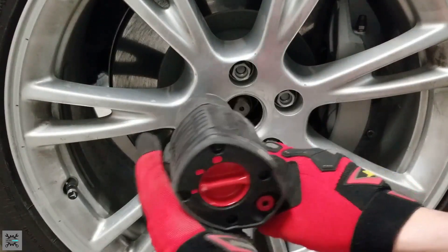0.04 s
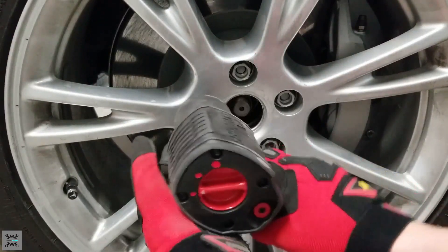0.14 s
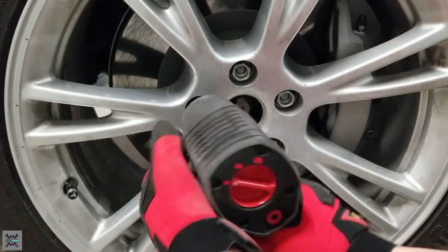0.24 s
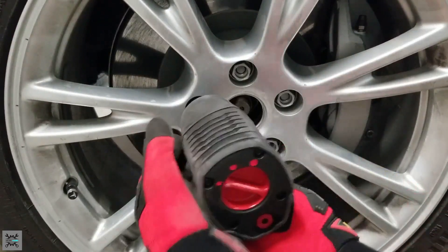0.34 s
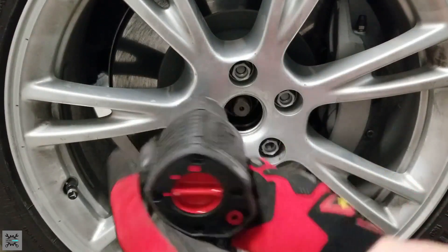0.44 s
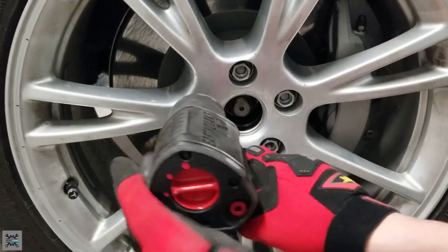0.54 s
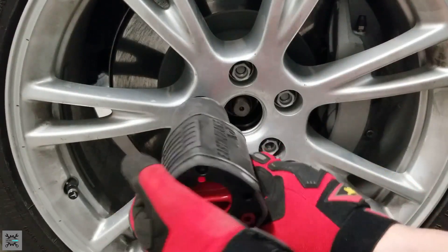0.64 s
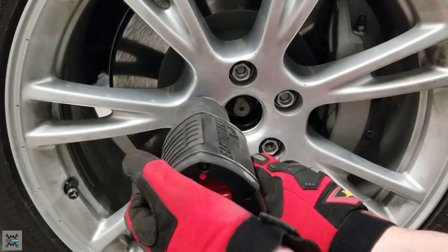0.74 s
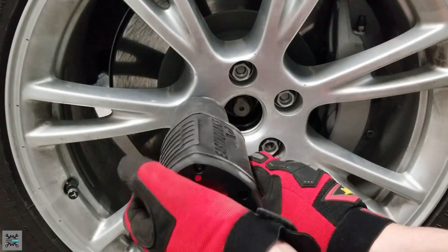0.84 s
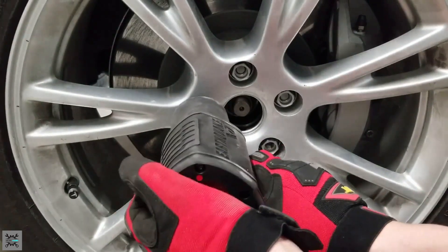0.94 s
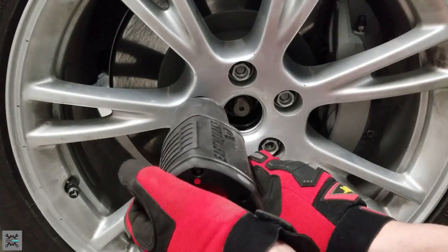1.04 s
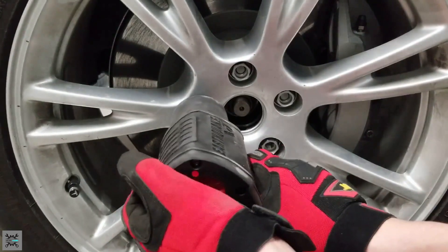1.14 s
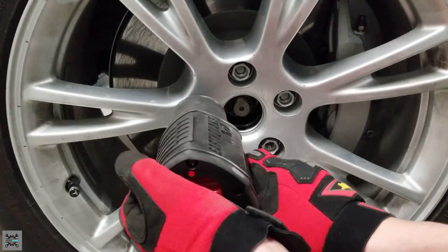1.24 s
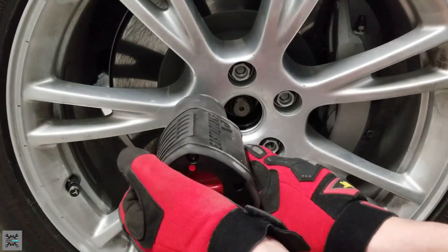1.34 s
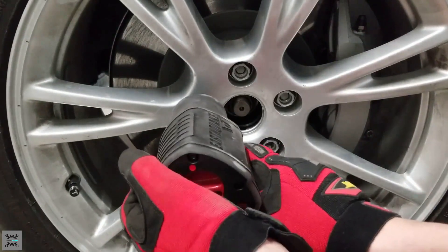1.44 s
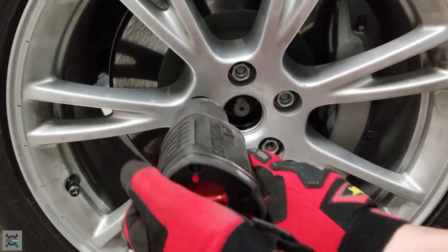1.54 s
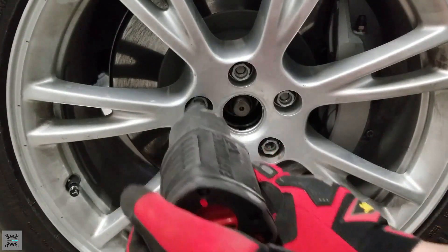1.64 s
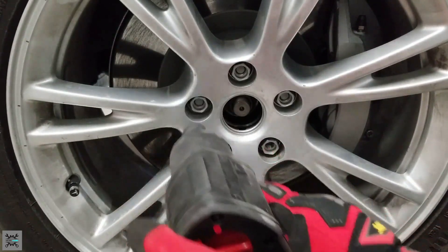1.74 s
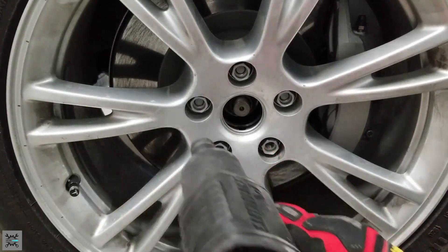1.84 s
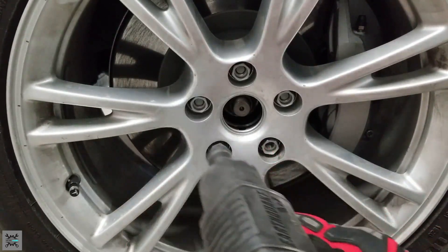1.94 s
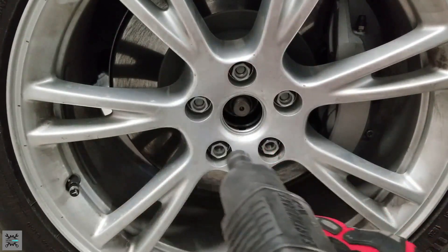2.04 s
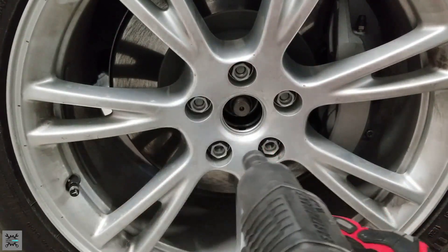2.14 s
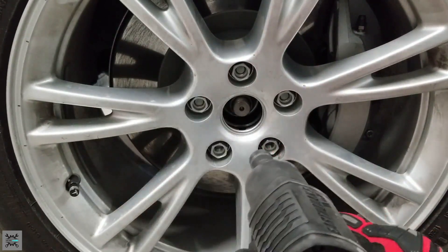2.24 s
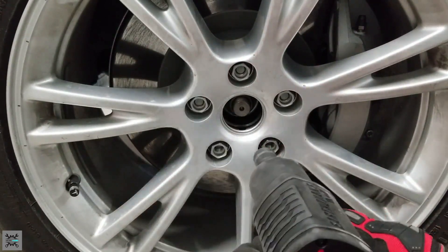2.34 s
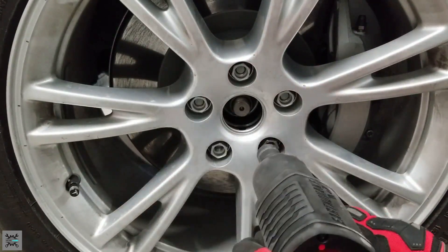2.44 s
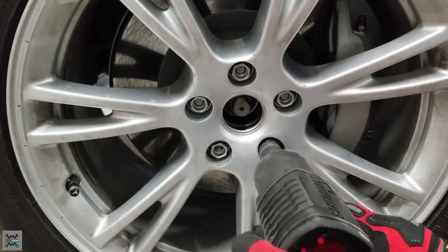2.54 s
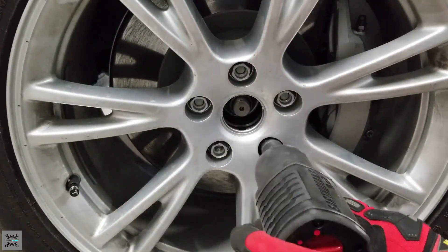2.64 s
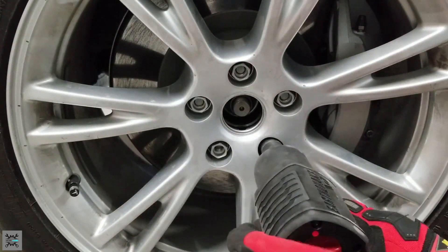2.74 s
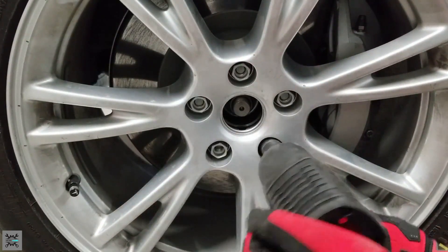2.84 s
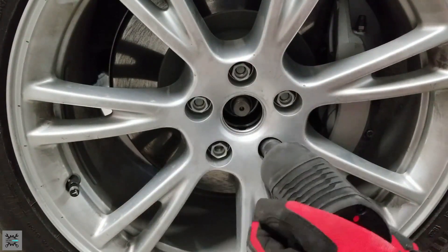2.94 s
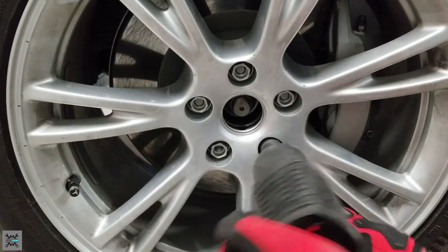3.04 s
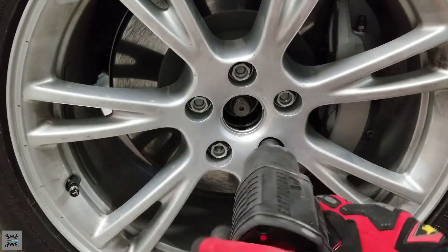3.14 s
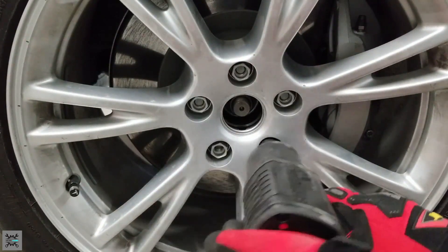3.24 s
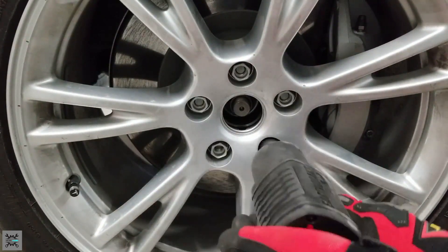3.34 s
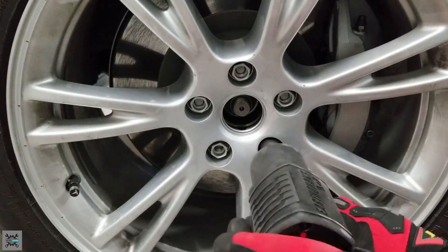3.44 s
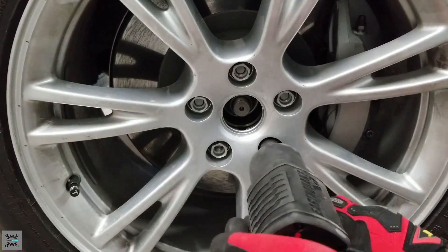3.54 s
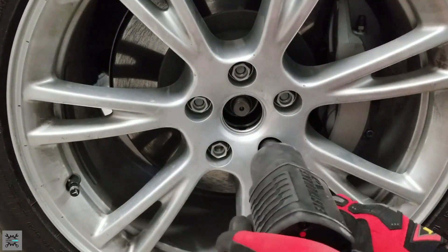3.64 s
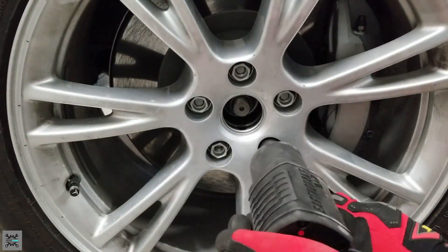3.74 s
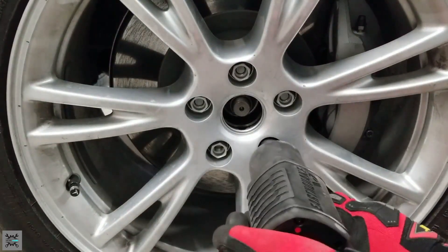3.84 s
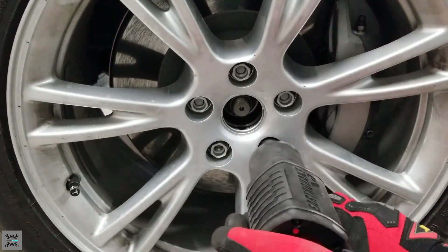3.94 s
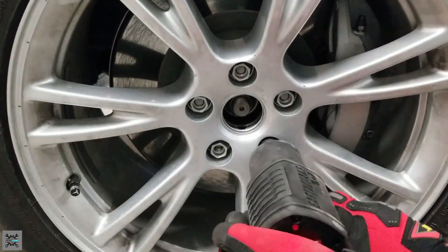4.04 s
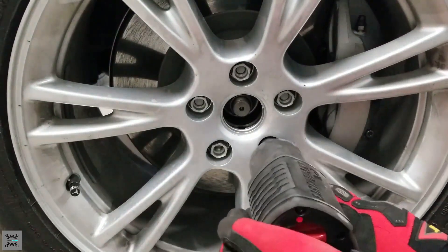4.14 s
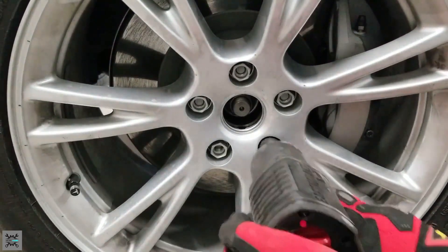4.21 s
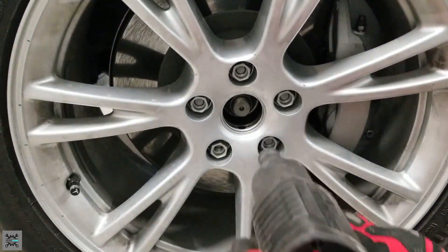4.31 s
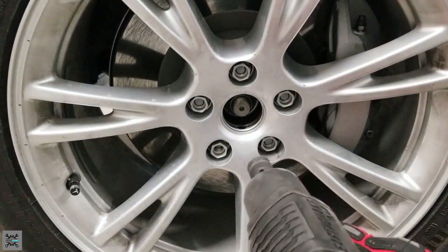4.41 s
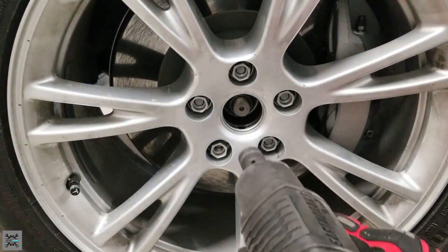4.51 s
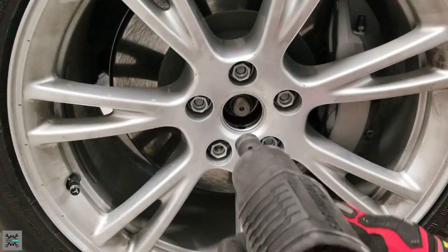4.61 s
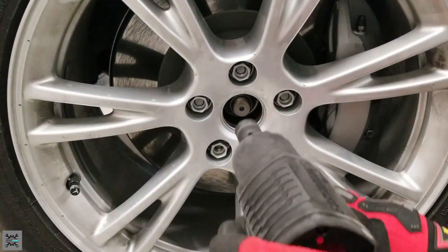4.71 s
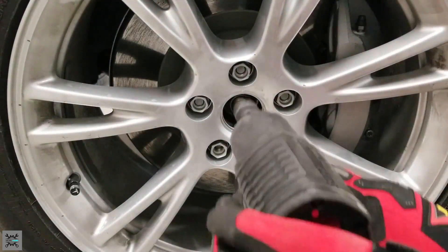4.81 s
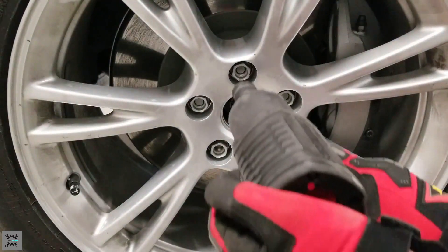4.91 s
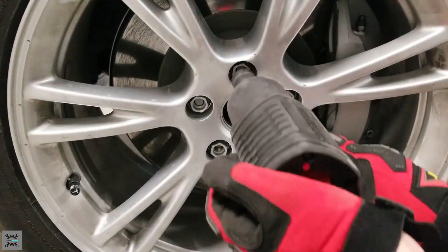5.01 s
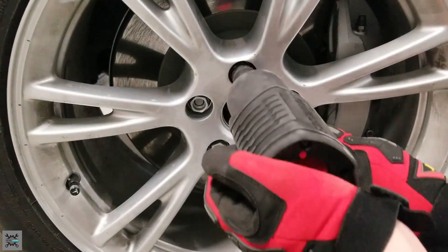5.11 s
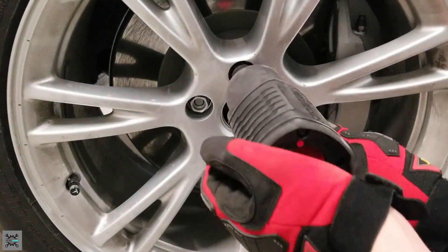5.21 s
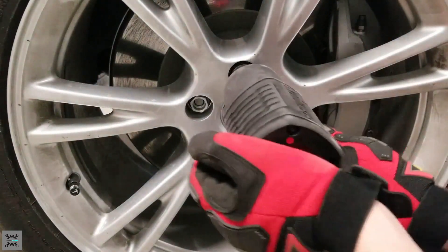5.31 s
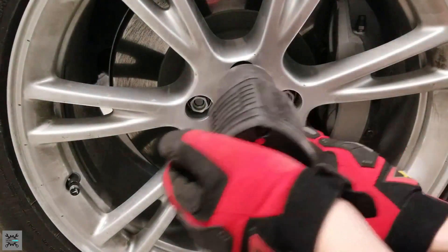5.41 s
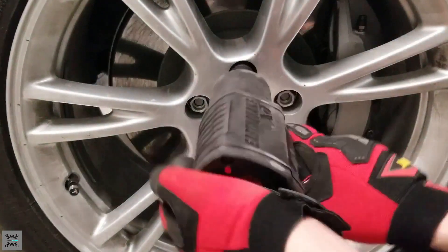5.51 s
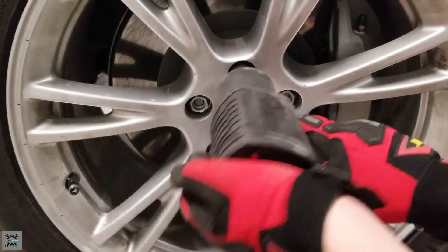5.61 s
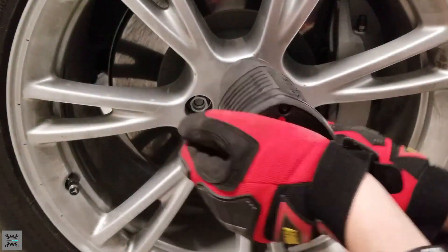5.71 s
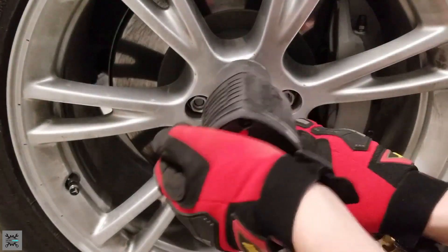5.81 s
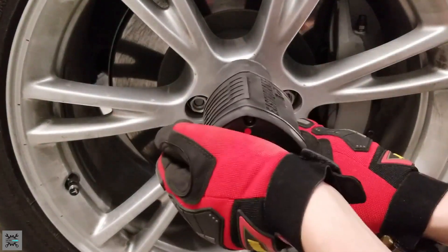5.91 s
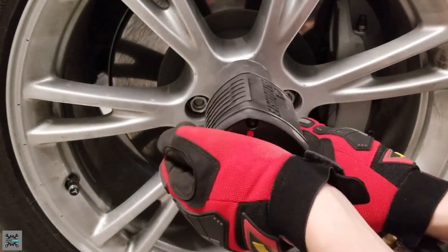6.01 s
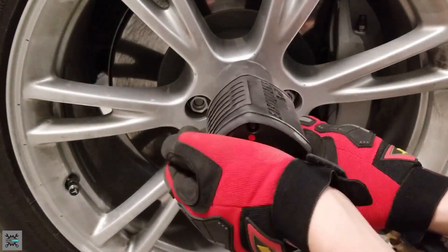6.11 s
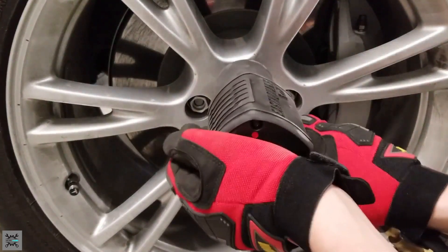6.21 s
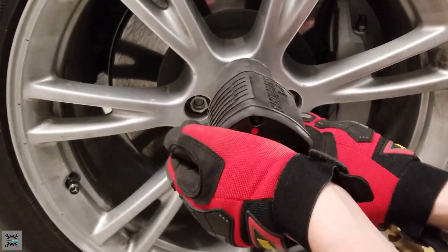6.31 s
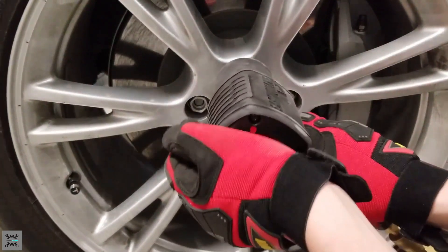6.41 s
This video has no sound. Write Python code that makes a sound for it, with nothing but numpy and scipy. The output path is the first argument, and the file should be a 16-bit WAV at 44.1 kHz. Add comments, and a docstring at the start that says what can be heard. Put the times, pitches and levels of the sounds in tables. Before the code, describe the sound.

Close up in a garage, a socket knocks against a wheel and gloves rub the tool. A cordless impact wrench fires a half-second burst: whining motor, very fast steel cracks, then slower blows. Clanks and scrapes lead to a second burst, then lighter fumbling and a third burst, which runs to the end. A faint hum lies underneath, with a short room echo.

```python
"""In a garage, gloved hands shift a cordless impact wrench and knock its socket onto the first nut of an alloy wheel.
A short trigger burst follows: the motor whines up, and each blow cracks, rattles the loose socket, jolts the
housing and rings the wheel; then the blows slow to about half or less and the motor labours.
Shuffles and knocks lead to a second nut and its burst, then to a third. A faint hum runs throughout.
Struck sounds are clicks into short noise or resonances; the motor is sine harmonics with pulsing noise."""
import sys
import numpy as np
from scipy import signal
from scipy.fft import rfft, irfft, next_fast_len
from scipy.io import wavfile

SR = 44100
rng = np.random.default_rng(int(sys.argv[2]) if len(sys.argv) > 2 else 0)


def file_out(sig):
    """Save sig as 16-bit WAV at sys.argv[1]."""
    # one column per channel
    cols = np.atleast_2d(sig).T
    # limit, then scale
    lim = np.clip(cols, -1, 1)
    pcm = np.round(lim * 32767).astype(np.int16)
    wavfile.write(sys.argv[1], SR, pcm)


N = 284886

# Volleys of hammer blows, two per nut, quick and then slower: (first blow [s], last blow [s], rate [blows/s],
# crack [relative dB], housing jolt [relative dB], second hit [dB relative to its blow])
VOLLEYS = [(0.862, 0.976, 45, -2.5, -14.5, -3), (1.004, 1.357, 23, -1.5, -21, -2.5),
           (3.539, 3.853, 41, -2, -22.5, -10.5), (3.88, 4.084, 24, -3, -23, -7.5),
           (6.044, 6.337, 44, -4, -24, -10), (6.395, 6.449, 13, -2.5, -13, -12)]
BLOW_JITTER_S, BLOW_SPREAD_DB, JOLT_SPREAD_DB = .0012, 0.6, 3.5  # standard deviations
STANDSTILL_DB, BLOW_BUILD_S = -12.5, 0.015  # blows gain force as the motor spins up: offset and time constant
SECOND_HIT_SHARE = .3  # the hammer bounces and hits again this far into the gap between blows
JOLT_FADE_DB = 5.5  # lost evenly through a volley
CRACK_FADE_DB, SECOND_HIT_FADE_DB, VOLLEY_END_S = 2.5, 10.5, 0.066  # lost towards its end; time constant
# Trigger bursts, one per nut: (trigger on [s], socket bites [s], motor labours [s], trigger off [s],
# free speed [Hz], loaded speed [Hz], kick of the bite [relative dB], whine [dB], gear grind [relative dB])
BURSTS = [(0.843, 0.870, 1.14, 1.325, 198, 180, -15, -28, -23.5),
          (3.501, 3.552, 3.79, 4.065, 272, 182, -10.5, -26.5, -21),
          (6.014, 6.053, 6.26, 6.46, 275, 155, -11, -24, -19.5)]
SPIN_UP_S, LABOUR_S, COAST_S = .085, .08, .1  # time constants of the motor's speed
START_DB, START_S = 35, 0.013  # the motor starts this far down and closes the gap with this time constant
LOAD_WHINE_DB, LOAD_GRIND_DB = -6, -7.5  # the motor quietens under load
COAST_DB_PER_S = 290  # and dies away once the trigger is let go
# How the plastic housing radiates the motor's tones: (frequency [Hz], level [dB])
HOUSING = [(60, -14), (110, -6), (210, -7), (340, -2), (480, -5.5), (600, -12), (720, -9.5), (900, -11.5),
           (1600, -13.5)]
# Wheel and socket modes: (frequency [Hz], width [Hz], gain at first, second, third nut [relative dB])
WHEEL = [(377, 50, -4, -2, -4), (676, 11, -3, 6, -5), (930, 14, 1, 3, 0), (1016, 18, 10, 12, 8),
         (1075, 22, 0, 3, -1), (1337, 20, -3, -4, 11), (1667, 18, -1, -5, 13), (1755, 18, -8, -1, 9),
         (1900, 25, -7, -6, 4), (1959, 14, 7, 4, 2), (2015, 16, -3, 1, -3), (2423, 22, -5, 0, 3),
         (2615, 55, -5, -4, 1), (2804, 25, 2, -4, 0), (3098, 28, 4, 0, 1), (4620, 40, -1, -1, -4),
         (5321, 22, -5, -3, -3)]
LOOSE_RING_DB, LOOSE_RING_S = 4, 0.4  # extra wheel ring up to the bite, fading after as the nut clamps the wheel
# Modes of the loose socket: (frequency [Hz], level [relative dB], t60 [s])
SOCKET = [(1063, 4.5, 0.2), (1205, -1, 0.12), (1295, -1, .18), (1390, -4, .1), (2640, -7, 0.17),
          (3080, -9, 0.25), (4470, -24, 0.45)]
# Socket knocking on nuts and wheel: (time [s], clank, thud, tick, socket ring [all relative dB])
KNOCKS = [(0.012, -33, -55, -54, -36.5), (0.282, -47.5, -49.5, -79, -47), (0.529, -19.5, -22.5, -31, -42),
          (0.769, -61.5, -61, -54, -62), (1.578, -30.5, -55, -39.5, -47), (1.707, -45.5, -63, -52.5, -62),
          (2.462, -30.5, -52.5, -76.5, -34.5), (2.647, -27, -48, -41.5, -30),
          (2.775, -40.5, -57, -62, -55.5), (2.883, -37.5, -48, -82, -49),
          (3.005, -42.5, -51.5, -77.5, -44.5), (3.084, -29.5, -53.5, -42, -49.5),
          (3.144, -25, -42, -37.5, -29), (3.274, -27.5, -38.5, -46.5, -32),
          (3.515, -16.5, -33, -27.5, -35.5), (4.165, -24, -39, -22, -33.5), (5.208, -42, -54, -48, -48.5),
          (5.443, -44, -46.5, -61, -59), (5.506, -39.5, -48.5, -54.5, -44),
          (5.584, -38.5, -44.5, -47.5, -54), (5.759, -46, -44.5, -49.5, -53), (5.797, -34, -48, -46, -50),
          (5.833, -33.5, -45, -59, -36), (6.028, -36.5, -42, -41, -43)]
TYRE_HZ, TYRE_WIDTH_HZ, TYRE_DB = 110, 5, 48  # a thud sets the wheel rocking on its tyre
# Pushes and shifts of the tool against the wheel:
# (start [s], end [s], rumble, socket scrape, glove rustle [all relative dB])
PUSHES = [(0.0, 0.442, -54, -64.5, -72.5), (0.429, 0.827, -47, -59, -67), (0.525, 0.634, -37.5, -48.5, -55),
          (1.363, 1.70, -57, -65.5, -72.5), (2.64, 3.492, -55.5, -66, -72),
          (3.097, 3.333, -46.5, -57.5, -65), (4.065, 4.236, -51.5, -61.5, -68.5),
          (5.327, 5.44, -65.5, -71, -71), (5.438, 5.733, -57, -54.5, -66.5), (5.739, 5.83, -43, -46, -59),
          (5.839, 6.02, -52, -79.5, -78)]
# A glove slides along the tool to a new grip: (start [s], end [s], level [dB])
SLIDES = [(0.386, 0.516, -52.5), (0.578, 0.685, -55)]
HAND_ATTACK_S, SLIDE_ATTACK_S, HAND_RELEASE_S = .04, .09, .035  # rise lengths; decay time constant
# Noise colours, each with (frequency [Hz], relative density [dB per Hz]):
# steel crack and gear grind, housing jolt and dull thud, clank, bright tick
CRACK = [(350, -15.5), (600, -8), (900, -0.5), (1500, -1), (2150, -3.5), (2600, 3), (3200, 0.5),
         (4800, 1.5), (6000, -3), (8500, -6), (11000, -3.5), (13000, -7.5), (16000, -9)]
JOLT = [(30, -36.5), (70, -20.5), (120, -7.5), (220, 1), (340, 10), (450, 2), (650, -14), (1500, -44)]
CLANK = [(400, -14), (800, -10), (1080, 2), (1400, -2.5), (1750, -2.5), (2200, -9.5), (2800, -6),
         (3500, -13), (5000, -19.5)]
TICK = [(1500, -11.5), (3000, 0.5), (5000, -1.5), (7000, -8.5), (9500, -18.5), (15000, -20)]
# the tool's rumble, socket scrape, glove rustle, glove swish, still air; same columns
RUMBLE = [(40, -11.5), (70, -2.5), (110, 2.5), (150, -5), (220, -3), (350, -12.5), (600, -30)]
SCRAPE = [(250, 3.5), (500, -3), (750, -2), (1100, 2.5), (1500, -2.5), (2200, -9), (3200, -13.5),
          (5000, -23)]
RUSTLE = [(1500, -8), (3000, -3.5), (4700, -1.5), (7000, -3), (9500, -13.5), (15000, -13.5)]
GLOVE = [(1200, -6), (2500, 2), (4800, 1.5), (7000, -2.5), (9000, -7), (15000, -4)]
FLOOR = [(30, -13), (70, -9), (130, -7.5), (260, 2), (350, -11.5), (480, -9), (620, -22), (1600, -27.5),
         (5000, -29.5), (15000, -31)]
FLOOR_DB = -72
# Steady hum: (frequency [Hz], level [dB])
HUM = [(183, -75), (274.5, -77), (301, -65.5), (468, -84)]
# Colour of the garage reverberation: (frequency [Hz], relative level [dB])
GARAGE = [(60, 5), (300, 5), (1000, 3.5), (4000, 4), (8000, 1), (15000, 7.5)]
# Its decay: (frequency [Hz], t60 [s])
GARAGE_T60 = [(100, 0.4), (300, 0.66), (1000, 0.75), (3000, 0.6), (5500, 0.59), (8000, 0.41), (13000, 0.23)]
# Likeness of the two channels in noise: (frequency [Hz], correlation [-1 to 1])
LIKENESS = [(60, .98), (250, .96), (700, .6), (1400, .4), (3000, .06), (12000, 0)]
# Where each nut lies, one entry per nut: (left over right [dB])
NUT_LEFT_DB = [3.5, 3.5, 4]
CUTOFF_HZ = 15900


def hammer():
    """Hammer meets anvil: a steel crack, the socket's rattle, a jolt of the housing, and the wheel's ring."""
    blow_s, crack_db, jolt_db = blows()
    bite_s = np.array([burst[1] for burst in BURSTS])
    kick_db = np.array([burst[6] for burst in BURSTS])
    jolt_s, all_jolts_db = np.append(blow_s, bite_s), np.append(jolt_db, kick_db)
    crack = contacts(blow_s, crack_db, per_s=900, rebound_db=1.5, t60=0.016)
    rattle = contacts(blow_s, crack_db, per_s=480, rebound_db=-1.5, t60=0.13)
    jolts = contacts(jolt_s, all_jolts_db, per_s=190, rebound_db=-2.5, t60=0.11)

    steel = from_db(8) * strike(crack, CRACK, t60=0.013)
    steel = steel + from_db(10) * strike(rattle, CRACK, t60=0.017)
    housing = from_db(19.0) * strike(jolts, JOLT, t60=0.04)
    loose = np.exp(-since(bite_s[current_nut()]) / LOOSE_RING_S)
    ring = wheel(rattle * from_db(15.5 + LOOSE_RING_DB * loose))
    return cut(steel + housing, 74, "high") + ring


def blows():
    """Nearly even blows, each with a second hit; weak until the motor is up to speed, fading through a volley."""
    hits, trigger_s = [], np.transpose(BURSTS)[0]
    for first, last, per_s, crack_db, jolt_db, second_db in VOLLEYS:
        on = trigger_s[trigger_s < first][-1]
        for done in np.linspace(0, 1, round((last - first) * per_s) + 1):
            timing, harder, heavier = rng.standard_normal(3)
            s = first + done * (last - first) + BLOW_JITTER_S * timing
            late = np.exp(-(last - first) * (1 - done) / VOLLEY_END_S)
            slow_db = STANDSTILL_DB * np.exp(-(s - on) / BLOW_BUILD_S)
            crack = crack_db + slow_db - CRACK_FADE_DB * late + BLOW_SPREAD_DB * harder
            jolt = jolt_db + slow_db - JOLT_FADE_DB * done + JOLT_SPREAD_DB * heavier
            bounce = second_db - SECOND_HIT_FADE_DB * late
            hits.append((s, crack, jolt))
            hits.append((s + SECOND_HIT_SHARE / per_s, crack + bounce, jolt + bounce))
    return np.transpose(hits)


def wheel(clicks, lag_s=0.0001):
    """Each nut feeds the wheel's modes differently; the ring reaches the right side a little later."""
    nut = current_nut()
    ring = np.zeros(N)
    for hz, width_hz, *nut_db in WHEEL:
        ring += resonate(clicks * from_db(nut_db)[nut], hz, width_hz)
    right = np.interp(np.arange(N) - lag_s * SR, np.arange(N), ring)
    return np.array([ring, right])


def motor(grind_db=-1, wobble=.02, flutter_db=2.5, mesh_depth=0.75, ring_db=-1):
    """Six harmonics of the turning rate whine; the gears grind once a turn and stir the wheel."""
    turn_hz, whine_gain, grind_gain = drive()
    rate_hz = turn_hz * (1 + wobble * drift(60))
    angle = 2 * np.pi * np.cumsum(rate_hz) / SR
    whine = np.zeros(N)
    for harmonic in range(1, 7):
        level_db = at_hz(HOUSING, harmonic * rate_hz) + flutter_db * drift(45)
        whine += from_db(level_db) * np.sin(harmonic * angle + 2 * np.pi * rng.random())
    teeth = grind_gain * (1 + mesh_depth * np.cos(angle))
    grind = teeth * noise(CRACK) + from_db(ring_db) * wheel(teeth * rng.standard_normal(N))
    return whine_gain * whine + from_db(grind_db) * grind


def drive():
    """Each burst spins up, sags under load and coasts down: turning rate in Hz, gains of whine and grind."""
    turn_hz, whine, grind = np.zeros((3, N))
    for on, _, labours, off, free_hz, loaded_hz, _, whine_db, grind_db in BURSTS:
        load = 1 - np.exp(-since(labours) / LABOUR_S)
        spin = (1 - np.exp(-since(on) / SPIN_UP_S)) * np.exp(-since(off) / COAST_S)
        power_db = -START_DB * np.exp(-since(on) / START_S) - COAST_DB_PER_S * since(off)
        power = (since(on) > 0) * from_db(power_db)
        turn_hz = turn_hz + spin * (free_hz + load * (loaded_hz - free_hz))
        whine = whine + power * from_db(whine_db + LOAD_WHINE_DB * load)
        grind = grind + power * from_db(grind_db + LOAD_GRIND_DB * load)
    return turn_hz, whine, grind


def knocks(socket_db=33, wheel_db=16):
    """The socket bumps a nut: a clank, a dull thud through tool and tyre, a bright tick and its own ring."""
    s, clank_db, thud_db, tick_db, ring_db = np.transpose(KNOCKS)
    clanks = cut(contacts(s, clank_db, per_s=180, rebound_db=2.5, t60=0.14), 2600, "low")
    thuds = contacts(s, thud_db, per_s=180, rebound_db=0.0, t60=.04)
    ticks = contacts(s, tick_db, per_s=400, rebound_db=1.5, t60=0.069)
    taps = contacts(s, ring_db, per_s=530, rebound_db=-12.0, t60=.04)

    ring = from_db(socket_db) * socket(taps) + from_db(wheel_db) * wheel(cut(clanks, 1700, "low"))
    clank = from_db(10) * strike(clanks, CLANK, t60=0.096)
    tick = from_db(20) * strike(ticks, TICK, t60=.022)
    tyre = cut(from_db(TYRE_DB) * resonate(thuds, TYRE_HZ, TYRE_WIDTH_HZ), 200, "low")
    thud = cut(cut(strike(thuds, JOLT, t60=.04), 700, "low"), 55, "high")
    return ring + clank + tick + tyre + from_db(26.5) * thud


def socket(clicks):
    """Steel socket modes; a longer ring makes a narrower, taller peak."""
    ring = np.zeros(N)
    for hz, db, t60 in SOCKET:
        width_hz = np.log(1000) / (np.pi * t60)
        ring += from_db(db) * 10 * t60 * resonate(clicks, hz, width_hz)
    return ring


def hands(grain_db=2.0):
    """The tool's weight rumbles against the wheel, the socket scrapes and the gloves rub on the grip."""
    moves = np.zeros((3, N))
    for start, end, *levels_db in PUSHES:
        moves += np.outer(from_db(levels_db), swell(start, end, HAND_ATTACK_S))
    rumble, scrape, rustle = moves
    weight = cut(rumble * noise(RUMBLE), 45, "high")
    friction = scrape * noise(SCRAPE) + rustle * noise(RUSTLE)
    return from_db(-2.5) * (weight + friction * from_db(grain_db * drift(170)))


def regrip():
    """Glove fabric swishes over the plastic housing as swells of coloured noise."""
    slides = sum(from_db(db) * swell(start, end, SLIDE_ATTACK_S) for start, end, db in SLIDES)
    return slides * noise(GLOVE)


def garage(x, wet_db=-11.5, build_s=0.0033):
    """Reflections build up quickly, then each octave of diffuse noise dies at its own rate, top treble soonest."""
    t, hz = np.arange(SR) / SR, np.fft.rfftfreq(SR, 1 / SR)
    centres = np.geomspace(60, 15360, 9)  # octaves, Hz
    diffuse, tail = rfft(noise(GARAGE, size=SR)), 0
    for centre, share in zip(centres, np.eye(len(centres))):
        band = irfft(diffuse * np.interp(hz, centres, share), SR)
        tail = tail + band * from_db(-60 * t / at_hz(GARAGE_T60, centre))
    tail = rms_one(tail * (1 - np.exp(-t / build_s))) / np.sqrt(SR)
    return from_db(wet_db) * signal.fftconvolve(x, tail, axes=1)[:, :N]


def background(waver_db=-1.5):
    """A faint, slightly wavering hum of sines over the noise of the garage's still air."""
    t = np.arange(N) / SR
    hum = np.zeros(N)
    for hz, db in HUM:
        tone = np.sqrt(2) * np.sin(2 * np.pi * (hz * t + rng.random()))
        hum += from_db(db + waver_db * drift(14)) * tone
    return hum + from_db(FLOOR_DB) * noise(FLOOR)


def contacts(times, levels_db, per_s, rebound_db, t60):
    """One click for each hit, then a train of uneven rebounds that dies away."""
    clicks, turn = np.zeros(N + SR), np.arange(1, 61)
    for s, level_db in zip(times, levels_db):
        delay = np.clip((turn + rng.uniform(-.5, .5, len(turn))) / per_s, 0, .5)
        uneven = from_db(2.5 * rng.standard_normal(len(turn)))
        sign = rng.choice([-1, 1], len(turn))
        sizes = from_db(rebound_db - 60 * delay / t60) * uneven * sign
        clicks[round(s * SR)] += from_db(level_db)
        clicks[((s + delay) * SR).astype(int)] += from_db(level_db) * sizes
    return clicks[:N]


def strike(clicks, spectrum, t60, count=16):
    """Clicks excite short noise bursts; the contact point, and so the colour, is redrawn every 6 ms."""
    t = np.arange(SR // 8) / SR
    point = rng.integers(0, count, N)[np.arange(N) // round(.006 * SR)]
    out = np.zeros((2, N + len(t)))
    for k in range(count):
        colour = [(hz, db + 2.5 * rng.standard_normal()) for hz, db in spectrum]
        ring = noise(colour, size=len(t)) * from_db(-60 * t / t60)
        ring /= np.sqrt(np.sum(ring ** 2) / 2)  # unit energy per channel
        for i in np.flatnonzero((clicks != 0) & (point == k)):
            out[:, i:i + len(t)] += clicks[i] * ring
    return out[:, :N]


def resonate(x, hz, width_hz):
    """A resonance with gain 1 on top."""
    r = np.exp(-np.pi * width_hz / SR)
    feed = np.array([1, 0, -1]) * (1 - r * r) / 2
    feedback = [1, -2 * r * np.cos(2 * np.pi * hz / SR), r * r]
    return signal.lfilter(feed, feedback, x + 1e-18)


def current_nut():
    """Index of the nut in work; the socket moves on midway between bursts."""
    on, _, _, off = np.transpose(BURSTS)[:4]
    return np.searchsorted((off[:-1] + on[1:]) / 2, np.arange(N) / SR)


def noise(spectrum, size=N):
    """Stereo noise of a given colour, fading past its ends; alike in the bass, unrelated on top; rms 1."""
    padded = next_fast_len(size, True)
    hz = np.fft.rfftfreq(padded, 1 / SR) + 1e-6
    mid, side = np.exp(2j * np.pi * rng.random((2, len(hz))))
    alike = np.clip(at_hz(LIKENESS, hz), -1, 1)
    ends = np.minimum(np.minimum(hz / spectrum[0][0], spectrum[-1][0] / hz), 1) ** 2
    both = np.sqrt(1 + alike) * mid + np.sqrt(1 - alike) * side * np.array([[1], [-1]])
    return rms_one(irfft(from_db(at_hz(spectrum, hz)) * ends * both, padded)[:, :size])


def drift(per_s):
    """Smooth random wander with rms 1."""
    at = np.arange(N) / SR * per_s
    return rms_one(np.interp(at, np.arange(4000), rng.standard_normal(4000)))


def since(s):
    """Seconds gone by since a moment; zero before it."""
    return np.maximum(np.arange(N) / SR - s, 0)


def swell(start, end, attack_s):
    """A move of the hands: attack, hold, release."""
    rise = np.minimum(since(start) / attack_s, 1)
    return np.sin(np.pi / 2 * rise) ** 2 * np.exp(-since(end) / HAND_RELEASE_S)


def cut(x, hz, kind, order=2):
    """Low-pass or high-pass."""
    return signal.sosfilt(signal.butter(order, hz, kind, fs=SR, output="sos"), x + 1e-18)


def from_db(db):
    """Decibels to gain."""
    return np.exp(np.asarray(db) * (np.log(10) / 20))


def rms_one(x):
    """Scale to unit rms."""
    return x / np.sqrt(np.mean(x ** 2) + 1e-20)


def at_hz(points, hz):
    """Read a table on a log-frequency axis."""
    points = np.array(points)
    return np.interp(np.log(hz + 1e-9), np.log(points[:, 0]), points[:, 1])


def scene(shadow_hz=480, room_left_db=3.5):
    """The work is close and to the left; the two sides differ less in the bass."""
    near = hammer() + motor() + knocks() + hands() + regrip()
    left_db = np.array(NUT_LEFT_DB)[current_nut()]
    direct = near * from_db(np.array([left_db, -left_db]) / 2)
    room = garage(near) * from_db(np.array([[room_left_db], [-room_left_db]]) / 2)
    left, right = direct + room
    mid, side = (left + right) / 2, (left - right) / 2
    # long waves bend round the microphones, so the side signal is held down in the bass
    hz = np.fft.rfftfreq(N, 1 / SR)
    side = irfft(rfft(side) * np.clip(hz / shadow_hz, .35, 1), N)
    return np.array([mid + side, mid - side]) + background()


def record(dry):
    """The highest peaks are rounded and the top of the treble is cut."""
    rounded = dry / (1 + (dry / .92) ** 4) ** .25
    return signal.sosfilt(signal.ellip(10, .1, 70, CUTOFF_HZ, fs=SR, output="sos"), rounded)


dry = scene()
out = record(dry)
file_out(out)
```